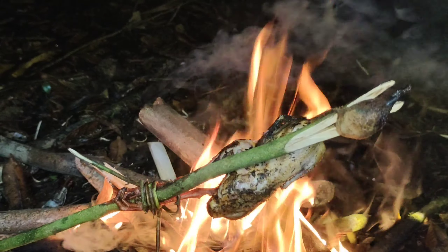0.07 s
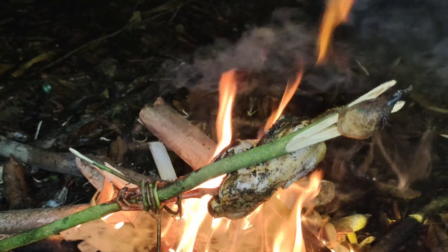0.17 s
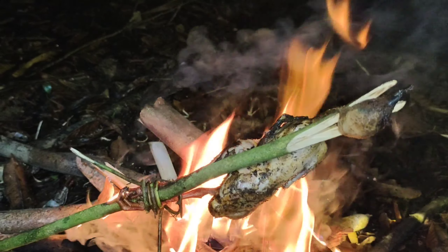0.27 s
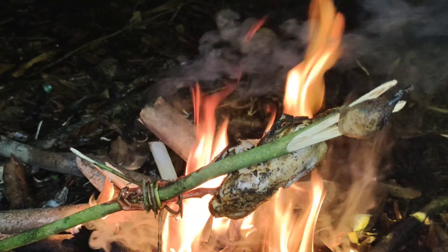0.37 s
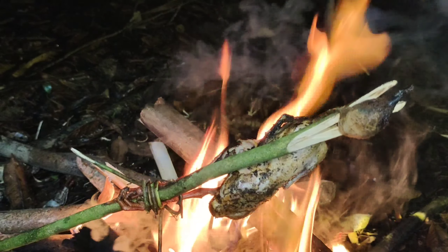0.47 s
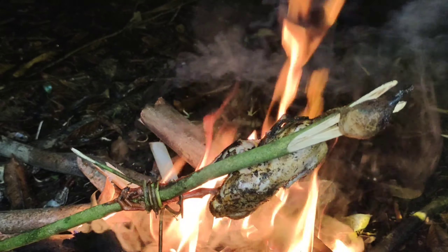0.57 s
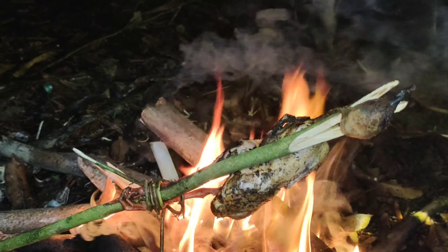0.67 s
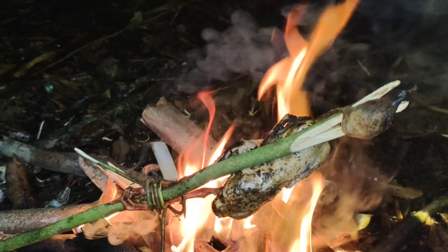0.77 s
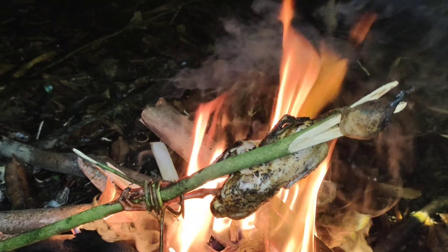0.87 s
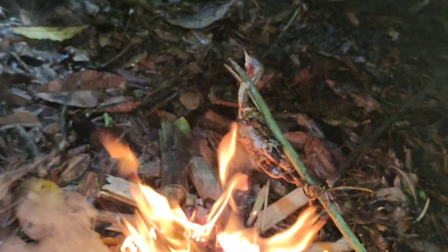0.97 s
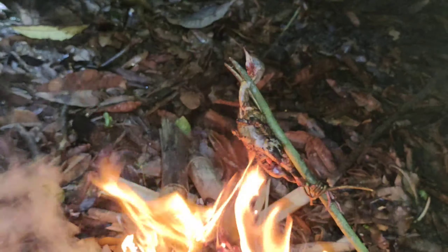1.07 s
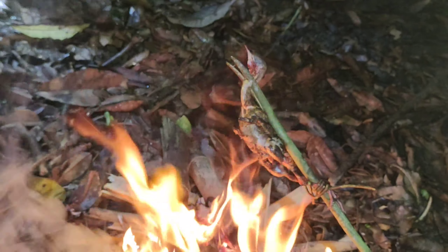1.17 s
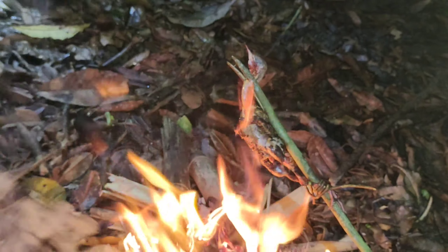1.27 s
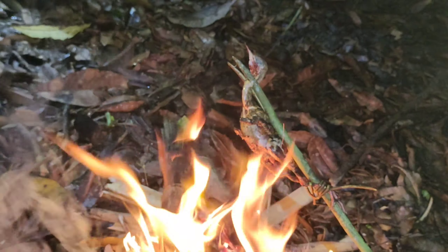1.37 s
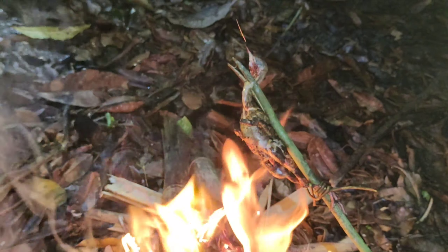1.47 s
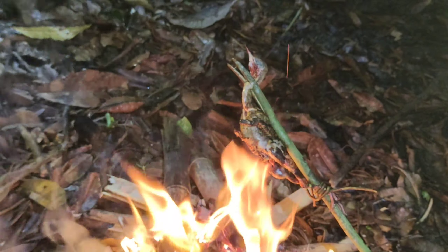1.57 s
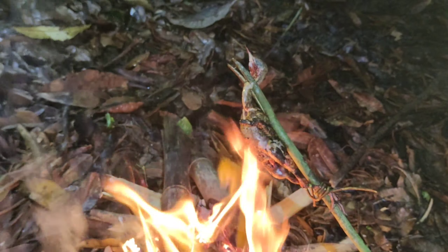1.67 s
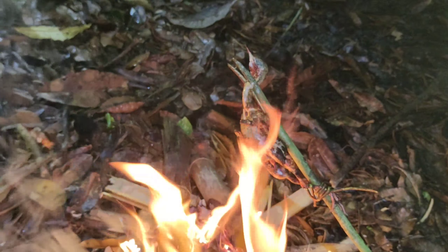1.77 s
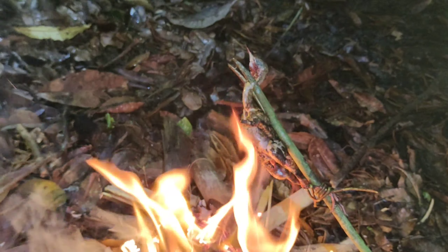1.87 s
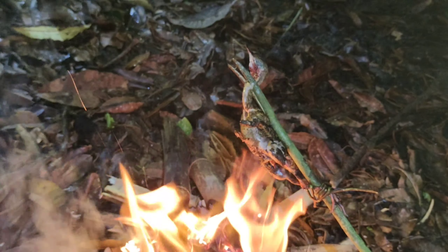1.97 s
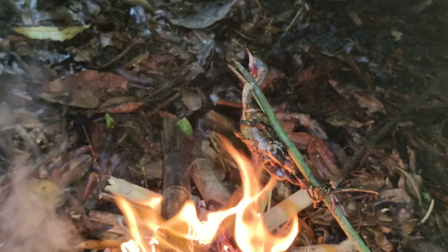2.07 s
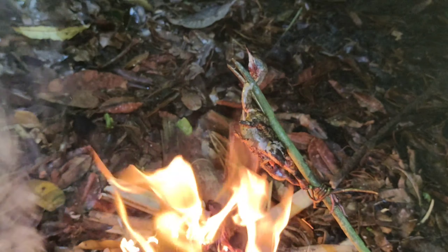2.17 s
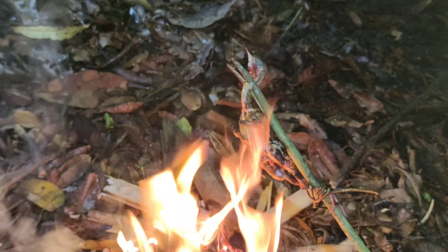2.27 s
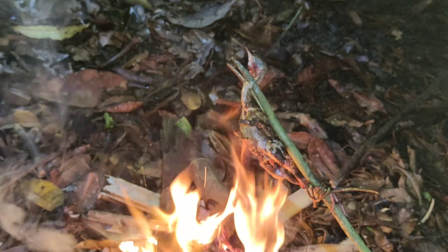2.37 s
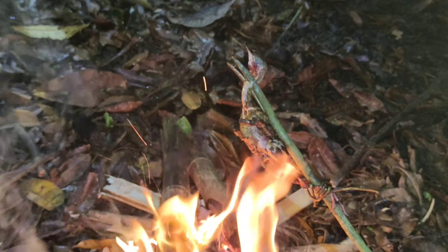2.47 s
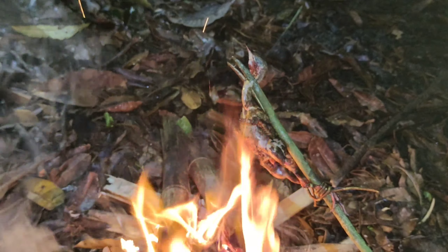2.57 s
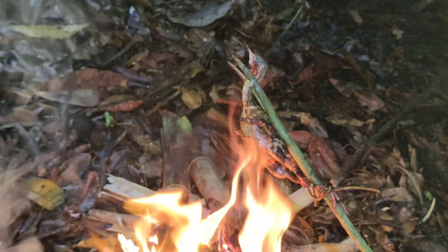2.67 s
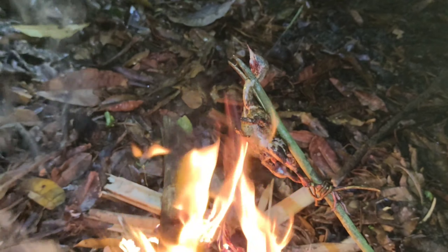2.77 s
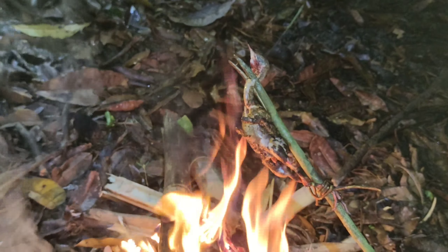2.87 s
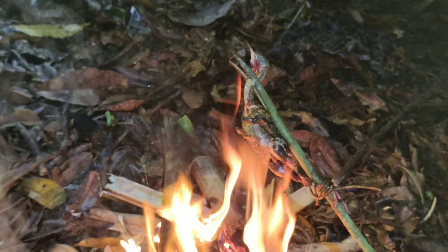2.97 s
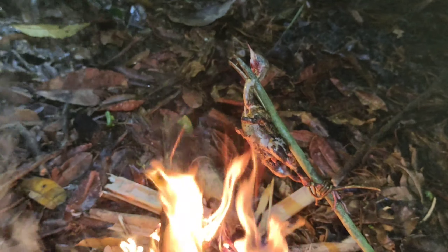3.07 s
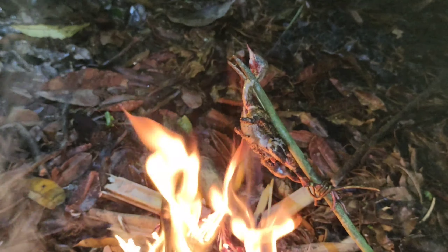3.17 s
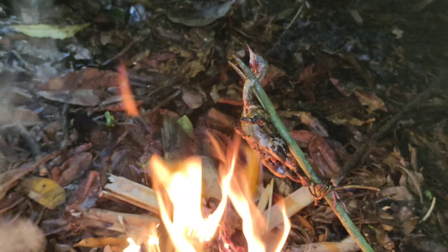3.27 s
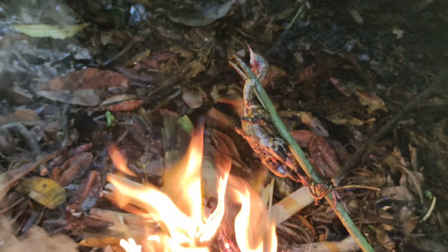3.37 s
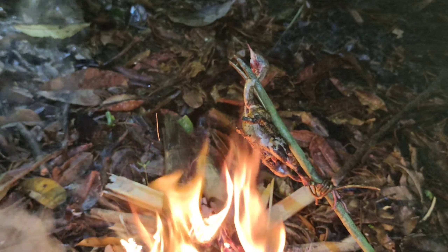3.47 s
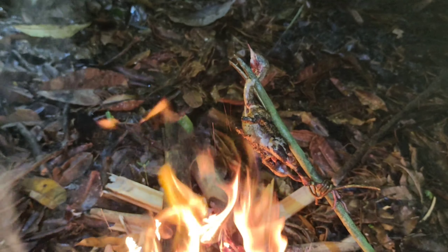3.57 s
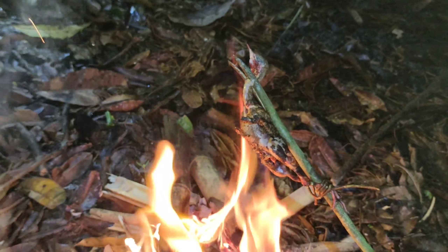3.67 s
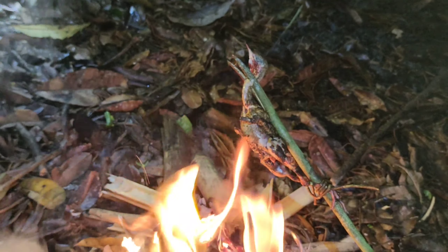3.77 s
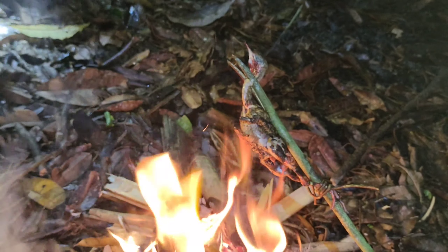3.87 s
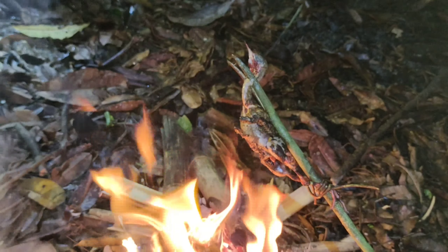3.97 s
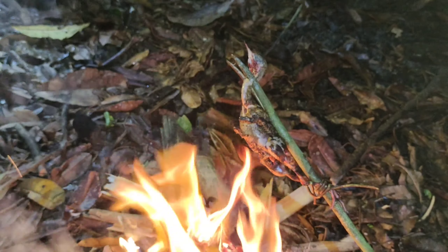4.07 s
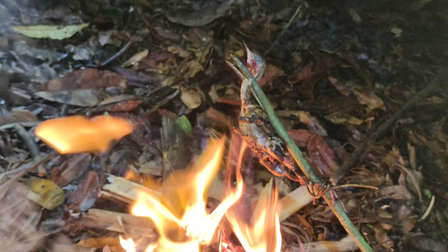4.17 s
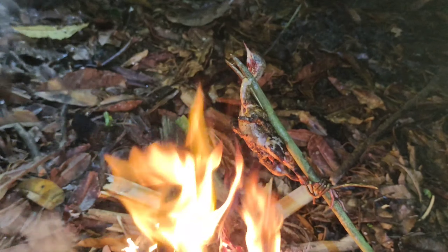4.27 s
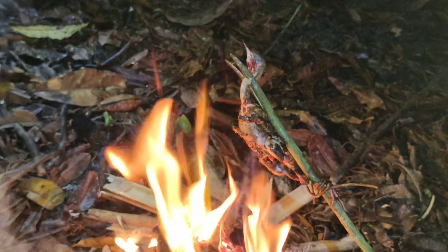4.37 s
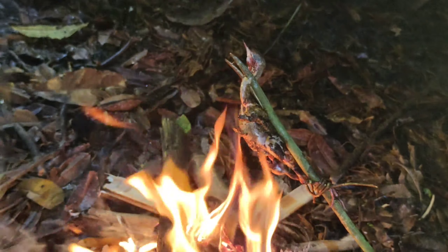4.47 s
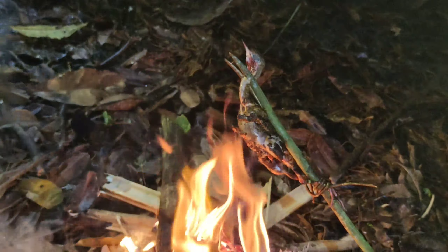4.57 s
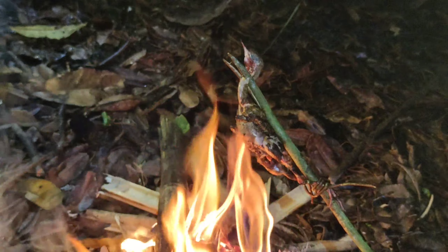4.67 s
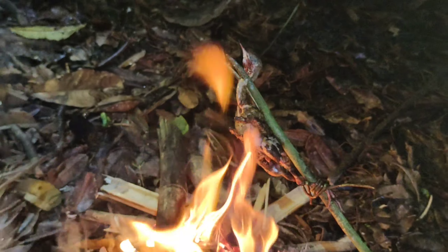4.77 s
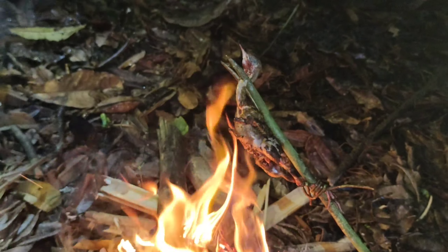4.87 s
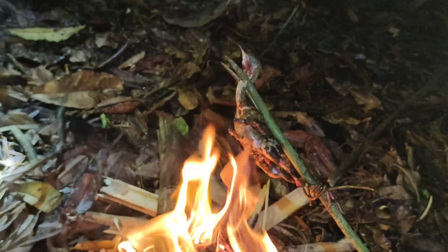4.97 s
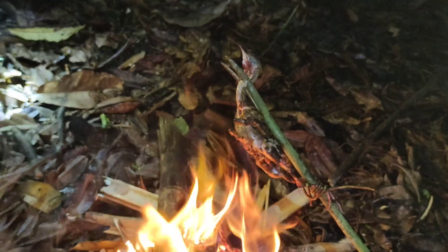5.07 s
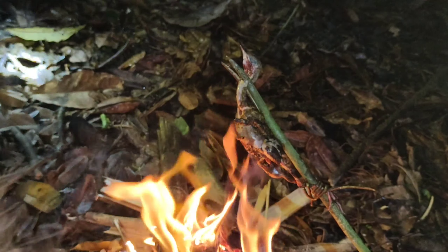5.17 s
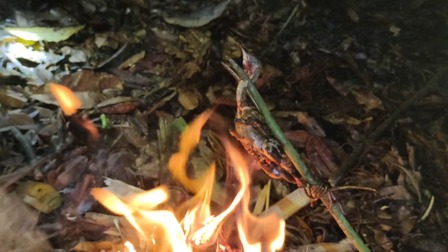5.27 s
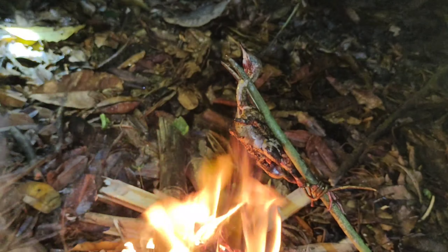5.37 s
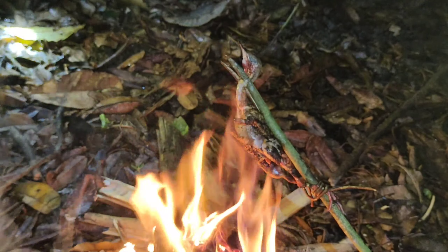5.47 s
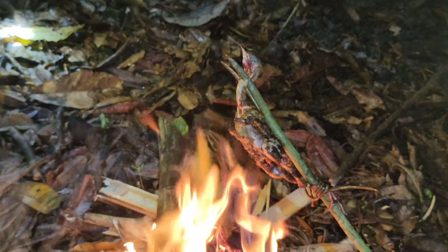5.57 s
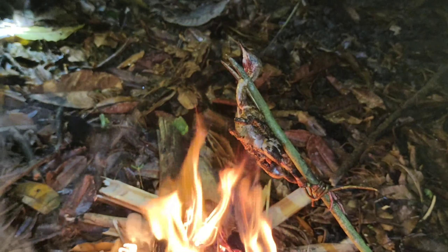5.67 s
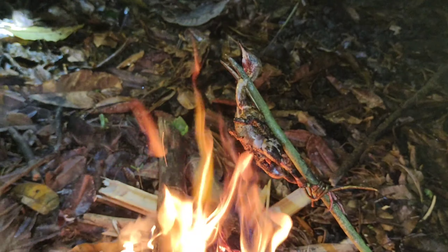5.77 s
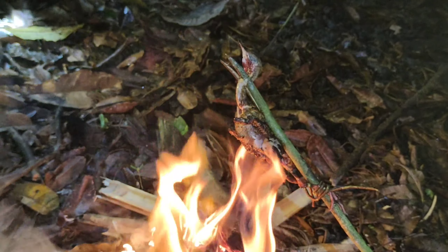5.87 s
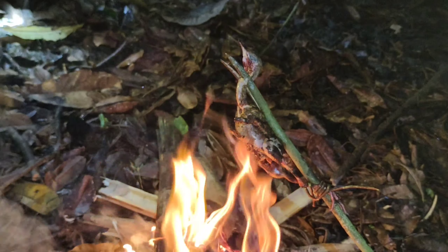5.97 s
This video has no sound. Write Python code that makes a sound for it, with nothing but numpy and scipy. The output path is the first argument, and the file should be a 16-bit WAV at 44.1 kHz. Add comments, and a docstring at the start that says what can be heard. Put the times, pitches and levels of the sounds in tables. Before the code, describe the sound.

Night insects buzz high in swelling waves around a small, close wood fire that softly flutters, sizzles and snaps.

```python
"""A high insect buzz, swelling in waves, around a small, close wood fire on a forest floor at night.
Crickets and katydids scrape their wings in pulses that the trees smear; far ones merge into steady bands.
Sticks snap and tick as fibres break. Burning gas puffs and flutters softly.
Sap sizzles and spits; its steam whistles faintly. A low hum rises briefly near the end."""
import sys
import numpy as np
from scipy import signal
from scipy.fft import rfft, irfft
from scipy.io import wavfile
from scipy.ndimage import uniform_filter1d

SR = 44100
rng = np.random.default_rng(int(sys.argv[2]) if len(sys.argv) > 2 else 0)


def persist_wave(psi):
    """Save psi, clipped to +-1, as 16-bit WAV."""
    counts = np.round(np.clip(psi, -1, 1) * 32767).astype(np.int16)
    wavfile.write(sys.argv[1], SR, np.atleast_2d(counts).T)


N = 265041
T = np.arange(N) / SR
HZ = np.maximum(np.fft.rfftfreq(N, 1 / SR), 1)

# raspy singers: name, f/Hz, stroke rate/Hz, lull level/dB
SINGERS = [("low", 6490, 34, -62.5), ("middle", 6640, 36, -64), ("high", 6870, 37, -62.5)]
# their overlapping phrases: singer, start/s, length/s, level/dB, L-R/dB
PHRASES = [("middle", 0.057, 0.34, -47.5, 3.8), ("high", 0.054, 0.25, -50, 2), ("low", 0.068, 0.17, -54, 2),
           ("high", 0.78, 0.24, -52, 7.7), ("middle", 0.844, 0.14, -49, 6.9), ("low", 0.88, 0.69, -56, 4.5),
           ("middle", 1.08, 0.51, -52, 6.9), ("high", 1.16, 0.4, -51, 5.9), ("high", 1.84, 0.28, -53, 7),
           ("middle", 1.896, 0.33, -47, 7.5), ("low", 1.95, 0.34, -53.5, 8.3),
           ("middle", 2.4, 0.42, -53, 6), ("high", 2.564, 0.27, -49, 7.6), ("middle", 2.93, 0.13, -49, 10),
           ("low", 3.11, 0.32, -53, 7.4), ("middle", 3.12, 0.34, -49.5, 4.7),
           ("high", 3.15, 0.36, -51.5, 6), ("low", 3.86, 0.42, -53.5, 8), ("middle", 4.02, 0.34, -49, 6.5),
           ("high", 4.09, 0.57, -50.5, 13.5), ("middle", 4.56, 0.37, -50.5, 6),
           ("low", 4.65, 0.38, -53, 7.1), ("middle", 5.3, 0.6, -49.5, 8), ("high", 5.5, 0.41, -50.5, 5),
           ("low", 5.56, 0.29, -53.5, 6)]
# cricket chirps: start/s, length/s, level/dB
CHIRPS = [(.45, .17, -56), (.98, .09, -50.5), (1.15, .19, -59), (1.51, .31, -52.2), (2.57, .34, -51),
          (3.26, .30, -51.5), (3.98, .28, -51.7), (4.48, .36, -59), (5.23, .36, -58.5), (5.92, .09, -54)]
# second cricket's pips: start/s, level/dB
PIPS = [(.3, -54), (.425, -59), (.545, -52.5), (.665, -56.5), (2.0, -62), (2.135, -63), (2.27, -62),
        (4.04, -61), (4.17, -58.5), (4.31, -61), (4.45, -62), (4.58, -61)]
# even cricket trills: start/s, length/s, f/Hz, stroke rate/Hz, level/dB, L-R/dB
TRILLS = [(0.992, 1.37, 7690, 76, -54.7, 15), (2.913, 2.23, 7690, 76, -54.4, 15),
          (5.55, 0.54, 7730, 87, -58.5, 7), (0, 0.43, 8370, 70, -61.5, -8), (.35, 0.76, 8020, 80, -65, 11),
          (0.56, 2.4, 6250, 60, -66.5, 12), (0.848, 0.48, 2960, 45, -73.5, 2),
          (2.05, .38, 4440, 68, -59, -2), (2.2, 0.2, 2980, 45, -72.5, 2), (2.587, 1.13, 3120, 44, -76, -3),
          (5.0, 0.24, 2980, 45, -72.5, 2)]
# katydid swells: centre/s, sigma/s, level/dB
LISPS = [(3.0, 0.058, -48), (3.203, 0.097, -52.5), (3.74, 0.074, -48), (4.12, 0.05, -51.5),
         (4.492, 0.061, -48), (4.68, 0.14, -52.5), (5.043, 0.054, -49), (5.45, 0.065, -46.5)]
# wood snaps; thin twigs ring high: t/s, body/dB, treble/dB, lowest ring/Hz, ring gain/dB
SNAPS = [(.0926, -63, -58, 800, -3), (.1255, -66, -58.5, 3200, 0), (.6296, -61, -66, 700, 2),
         (.885, -61, -67, 800, 0), (.9482, -62, -56, 3000, 0), (.962, -59, -64, 950, 0),
         (1.1456, -57.5, -58.5, 2700, 0), (1.262, -64, -53.5, 3000, 0), (1.2739, -55.5, -62, 2900, 5),
         (1.2987, -67, -55, 3000, 0), (1.8198, -56, -55.5, 1900, 2), (1.8483, -55.5, -55, 2600, 1),
         (2.2794, -62, -55.5, 1800, 0), (2.4692, -46.5, -43.7, 720, -3), (3.1355, -61, -66, 700, -3),
         (3.142, -55.5, -58, 600, -3), (3.1881, -52.5, -46, 760, 11), (3.2439, -60, -59, 900, 0),
         (3.4399, -56.5, -57, 1300, 0), (3.6, -57, -55.5, 1200, 2), (3.7869, -58, -56, 2200, 0),
         (3.8695, -64, -58, 2600, 0), (4.3518, -56, -51.5, 2700, 0), (4.6127, -57, -59, 2700, 4),
         (4.8398, -53, -50, 1400, 0), (5.1162, -69, -52.5, 3200, 0), (5.2958, -58, -65, 2600, 7),
         (5.3613, -56, -54, 2300, 4), (5.7192, -68, -53.5, 2400, 0)]
# stick resonances: multiple of lowest ring, Q, gain/dB
STICK_MODES = [(1, 9, -5), (1.54, 8, 0)]
# spectrum of a snap's bright crack: f/Hz, gain/dB
CRACK_EQ = [(1000, -18), (5000, -6), (8000, 0), (9500, 4), (11500, 2), (15000, 3)]
# spectrum of a snap's woody knock: f/Hz, gain/dB
KNOCK_EQ = [(200, -8), (650, 5), (1200, 4), (2500, 3), (4500, 1), (7000, -6), (15000, -22)]
# gas igniting: t/s, level/dB, final f/Hz
PUFFS = [(.317, -47, 140), (.353, -49, 185), (.38, -46.5, 145), (.461, -43, 170), (.497, -49.5, 115),
         (.53, -50, 125), (.582, -47.5, 210), (.632, -47, 150), (.655, -49, 120), (.724, -48.5, 125),
         (.866, -48, 170), (.878, -46.5, 235), (1.36, -46.5, 170), (2.817, -45, 200), (2.863, -46, 150),
         (3.14, -49.5, 210), (3.65, -45, 135), (3.903, -49, 160), (4.02, -50, 320), (4.056, -49, 210),
         (5.165, -47.5, 160), (5.637, -49, 160)]
# flame spectrum: f/Hz, gain/dB
FLAME_EQ = [(15, -60), (25, -42), (43, -34), (82, -1), (102, 1), (160, 0), (244, -9), (350, -11.5),
            (502, -19.5), (763, -24), (900, -40), (1170, -50), (1980, -120)]
# flame stereo width: f/Hz, side-mid/dB
FLAME_SIDE_EQ = [(30, -30), (80, -16), (160, -13.5), (350, -7), (700, -3.5)]
# flare-ups: centre/s, sigma/s, level/dB
FLARES = [(3.72, 0.11, -63.5)]
# sap boiling up: centre/s, sigma/s, level/dB
SURGES = [(3.17, 0.04, -55.5), (3.48, 0.047, -55.5), (3.78, 0.031, -54), (4.33, 0.1, -59.5),
          (4.6, 0.044, -59), (4.85, 0.034, -50.5), (4.935, 0.017, -55), (4.9, 0.11, -54.5)]
# sizzle spectrum: f/Hz, gain/dB
SIZZLE_EQ = [(400, -8), (720, 0), (1000, -0.5), (1450, -3), (1950, 1.5), (2600, 1.5), (3100, 0), (3700, -9),
             (5000, -19), (7000, -5), (15000, -5)]
# sap spurt spectrum: f/Hz, gain/dB
SPURT_EQ = [(400, -12), (900, -5), (3000, 1), (5000, 4), (9000, 5.5), (15000, 3)]
# steam whistles: start/s, length/s, first f/Hz, last f/Hz, level/dB, hoarseness as share of f
WHISTLES = [(1.92, .055, 1110, 1150, -71, .04), (2.025, .09, 1050, 1020, -67, .06),
            (4.94, .11, 2030, 1800, -71, .01), (5.15, .18, 1835, 1795, -72, .01),
            (5.46, .22, 1790, 1740, -75, .01)]
# far insect bands, and a broad high air hiss: f/Hz, width/Hz, level/dB, L-R/dB
FAR_BANDS = [(2920, 510, -68, -0.5), (3420, 187, -66.5, 2.5), (4005, 215, -63, -1), (4543, 257, -57.5, 2),
             (5636, 364, -58.5, 2.5), (6460, 890, -55.5, 2), (8420, 1570, -52, -7),
             (9100, 2360, -55.5, -2.5), (13400, 5700, -58.5, 0.5), (15000, 2000, -63, 19)]
# effort of far bands above 8 kHz, used relative to its mean: t/s, level/dB
FAR_EFFORT = [(0.0, -55), (0.85, -54.5), (2.16, -52), (4.17, -51.5), (4.89, -50.5), (5.6, -50.5),
              (6.01, -52.5)]


def wave_chorus(lull_side_db=8):
    """Three raspy singers overlap phrases; the buzz shifts pitch as they enter and drop out."""
    out = 0
    for name, hz, stroke_hz, lull_db in SINGERS:
        drifting_hz = hz * (1 + .004 * walk(7))
        song = wings(drifting_hz, stroke_hz, duty=.5, droop=.014, unsteady=.12, waver=.006)
        power = (undb(lull_db) * pan(lull_side_db)) ** 2
        for singer, start, length, db, side_db in PHRASES:
            if singer == name:
                power = power + phrase_power(start, length) * (undb(db) * pan(side_db)) ** 2
        out = out + unit(forest(song, wet_db=5, t60_s=.17)) * np.sqrt(power)
    return out


def chirping_cricket(hz=4531, stroke_hz=68):
    """Uneven wing strokes purr in chirps, on the right."""
    chirps = sum(gate(start, length, edge_s=.04) * undb(db)
                 * wings(hz, stroke_hz, duty=1, droop=.0037, unsteady=.0706, waver=.002)
                 for start, length, db in CHIRPS)
    flicker = undb(1.2 * walk(40))
    return forest(chirps * flicker, wet_db=-7, t60_s=.35) * pan(-15.5)


def pipping_cricket(hz=4715, stroke_hz=85):
    """Short runs of pips, a few wing strokes each."""
    runs = sum(undb(db) * gate(start, length_s=.05, edge_s=.0088) for start, db in PIPS)
    song = wings(hz, stroke_hz, duty=.9, droop=.008, unsteady=.1, waver=.004)
    return forest(runs * song, wet_db=0, t60_s=.1)


def trilling_crickets():
    """Small crickets trill, each at its own even stroke rate."""
    songs = sum(undb(db) * gate(start, length, edge_s=.02) * pan(side_db)
                * wings(hz, stroke_hz, duty=1, droop=.0025, unsteady=.01, waver=.00354)
                for start, length, hz, stroke_hz, db, side_db in TRILLS)
    return forest(songs, wet_db=-6, t60_s=.3)


def katydid():
    """Very high, toneless rasps swell and fade on the left."""
    rasp = unit(band(14800, width_hz=1700) + band(12500, width_hz=4700))
    flutter = undb(walk(190))
    return swells(LISPS) * rasp * flutter * pan(6.5)


def ticks(latest_s, per_s=2, body_db=-66.5, treble_db=-64, spread_db=2.5, ring_hz=900):
    """Faint snaps at random times, as rows like SNAPS."""
    return [(when * latest_s, body_db + spread_db * (2 * body - 1),
             treble_db + spread_db * (2 * treble - 1), ring_hz * 2 ** octaves, 0)
            for when, body, treble, octaves in rng.random((round(per_s * T[-1]), 4))]


def snaps(fastest_tear_s=.00014, rattle_s=.0022, rattle_gain=.11):
    """A fibre breaks: a crack, and a push that knocks and rings its stick. Litter scatters both."""
    crack, knock = np.zeros((2, 2, N))
    stick = np.zeros(N)
    t = T[:1024]
    hardest_db = max(row[2] for row in SNAPS)
    for at_s, body_db, treble_db, ring_hz, ring_db in SNAPS + ticks(latest_s=T[-2 * len(t)]):
        i = int((at_s + .0014) * SR)
        span = slice(i, i + len(t))
        noise = rng.standard_normal((3, len(t)))  # left, right, common
        tear_s = fastest_tear_s / undb(treble_db - hardest_db)  # weak breaks tear slowly
        tear = (noise[:2] + noise[2]) * np.exp(-t / tear_s)
        crack[:, span] += unit(tear) * undb(treble_db) * pan(4)
        rattle = rattle_gain * noise[2] * np.exp(-t / rattle_s)
        push = unit((t == 0) + rattle) * undb(body_db)
        highpass = signal.butter(2, ring_hz / 2 ** .5, "high", fs=SR)
        knock[:, span] += signal.lfilter(*highpass, push)
        for multiple, q, db in STICK_MODES:
            mode = signal.iirpeak(multiple * ring_hz, q, fs=SR)
            stick[span] += undb(ring_db + db) * signal.lfilter(*mode, push)
    return forest(colour(crack, CRACK_EQ) + colour(knock, KNOCK_EQ) + stick, wet_db=-5, t60_s=.05)


def puffs(swell_s=.0045, sag=.15, thump_db=-3.3, rush_db=-14):
    """A gas pocket ignites: a thump that sinks in pitch as it expands, plus a ragged rush."""
    out = np.zeros(N)
    rush = undb(rush_db) * band(310, width_hz=320)[0]
    t = T[:SR // 20]
    swell = t / swell_s * np.exp(1 - t / swell_s)
    for at_s, db, hz in PUFFS:
        i = int(at_s * SR)
        span = slice(i, i + len(t))
        cycles = hz * (t + sag * swell_s * (1 - np.exp(-t / swell_s)))
        thump = undb(thump_db) * np.sin(2 * np.pi * cycles)
        out[span] += undb(db) * swell * (thump + rush[span])
    return out


def flames(steady_db=-60):
    """Burning gas: a low, uneven flutter, near mono, with one flare-up."""
    mid, side = colour(rng.standard_normal((2, N)), FLAME_EQ)
    stereo = mid + colour(side, FLAME_SIDE_EQ) * np.array([[1], [-1]])
    flutter = undb(1.7 * walk(45))
    burn = np.hypot(undb(steady_db), swells(FLARES))
    return unit(flutter * stereo) * burn


def sap_sizzle(simmer_db=-61, bursts_per_s=900):
    """Sap simmers as a smooth hiss; in surges, tiny cells burst through it."""
    bursts = (rng.random(N) < bursts_per_s / SR) * rng.standard_normal(N)
    bursts *= undb(2.4 * np.minimum(rng.exponential(size=N), 4))
    grains = unit(forest(bursts, wet_db=-3, t60_s=.04))
    hiss = unit(rng.standard_normal(N) + undb(2) * rng.standard_normal((2, N)))
    simmer = unit(colour(hiss, SIZZLE_EQ))
    boil = unit(colour(grains + hiss[::-1, ::-1], SIZZLE_EQ))  # reversed to decorrelate
    return simmer * undb(simmer_db) + boil * swells(SURGES)


def sap_spurt(centre_s=4.845, sigma_s=.019, db=-44, drops_per_s=1700):
    """A sap pocket bursts in a brief, bright sputter of droplets."""
    onsets = rng.random(N) < drops_per_s / SR
    drops = onsets * (rng.standard_normal(N) + rng.standard_normal((2, N)))
    spray = colour(unit(drops) + rng.standard_normal((2, N)), SPURT_EQ)
    return unit(spray) * swells([(centre_s, sigma_s, db)])


def steam_whistles():
    """Thin steam jets whistle, gliding as their pressure changes."""
    out = 0
    quiver, flicker = walk(300), undb(2.5 * walk(40))
    for start, length, first_hz, last_hz, db, hoarse in WHISTLES:
        glide_hz = np.interp(T, [start, start + length], [first_hz, last_hz])
        out = out + gate(start, length, edge_s=.019) * undb(db) * tone(glide_hz * (1 + hoarse * quiver))
    return out * flicker


def far_chorus(flicker_db=1.48):
    """Each far species holds its own band and flickers a little; a broad, soft air hiss fills the top."""
    effort_db = np.interp(T, *np.transpose(FAR_EFFORT))
    effort = undb(effort_db - effort_db.mean())
    return sum(band(hz, width_hz) * undb(db + flicker_db * walk(14)) * pan(side_db)
               * (effort if hz > 8000 else 1) for hz, width_hz, db, side_db in FAR_BANDS)


def low_hum(hz=96, db=-59):
    """A faint, wavering hum rises briefly under the fire."""
    hum = tone(hz * (1 + .0201 * walk(17)))
    return gate(start_s=4.46, length_s=.6, edge_s=.08) * undb(db + 1.6 * walk(6.5)) * hum


def wings(hz, stroke_hz, duty, droop, unsteady, waver):
    """Each stroke rings the wing for `duty` of a cycle; pitch droops as the stroke slows."""
    cycle = np.cumsum(stroke_hz * (1 + unsteady * walk(25)) / SR) % 1
    stroke = np.minimum(cycle / duty, 1)
    ring_hz = hz * (1 + droop * (.5 - stroke) * (stroke < 1) + waver * walk(150))
    return unit(np.sin(np.pi * stroke) * tone(ring_hz))


def forest(x, wet_db, t60_s):
    """Direct sound plus scatter from trunks and leaves, different at each ear."""
    t = T[:SR // 2]
    scatter = rng.standard_normal((2, len(t))) * np.exp(-np.log(1000) * t / t60_s)
    scatter /= np.sqrt(np.sum(scatter ** 2, axis=1, keepdims=True))
    wet = signal.fftconvolve(np.atleast_2d(x), scatter, axes=1)[:, :N]
    return (x + undb(wet_db) * wet) / np.sqrt(1 + undb(2 * wet_db))


def phrase_power(start_s, length_s, rise_s=.024, fall_s=.033):
    """Power envelope: swell, hold, fade."""
    rise = 1 + np.tanh((T - start_s) / (2 * rise_s))
    fall = 1 + np.tanh((start_s + length_s - T) / (2 * fall_s))
    return rise * fall / 4


def swells(rows):
    """Gaussian gain swells, added in power."""
    return np.sqrt(sum(undb(2 * db) * np.exp(-((T - at_s) / sigma_s) ** 2) for at_s, sigma_s, db in rows))


def gate(start_s, length_s, edge_s):
    """Window with linear edges."""
    return np.clip(np.minimum(T - start_s, start_s + length_s - T) / edge_s + .5, 0, 1)


def tone(hz):
    """Sine following a per-sample frequency."""
    return np.sin(2 * np.pi * np.cumsum(hz) / SR)


def band(hz, width_hz):
    """Two independent noises in a bell-shaped band."""
    bell = .5 ** (2 * ((HZ - hz) / width_hz) ** 2)
    return unit(irfft(rfft(rng.standard_normal((2, N))) * bell, N))


def colour(x, points):
    """Filter by points of f/Hz, gain/dB."""
    hz, db = np.transpose(points)
    return irfft(rfft(x) * undb(np.interp(np.log(HZ), np.log(hz), db)), N)


def walk(rate_hz):
    """Smooth random drift, rms 1."""
    hold = max(int(SR / rate_hz), 2)
    steps = np.repeat(rng.standard_normal(N // hold + 1), hold)
    return unit(uniform_filter1d(steps, hold)[:N])


def pan(side_db):
    """Constant-power gains for an L-R level difference."""
    gains = undb(np.array([side_db, -side_db]) / 2).reshape(2, -1)
    return gains / np.sqrt(np.mean(gains ** 2, axis=0))


def undb(db):
    """Decibels to gain."""
    return 10 ** (np.asarray(db) / 20)


def unit(x):
    """Scale to rms 1."""
    return x / np.sqrt(np.mean(x ** 2) + 1e-18)


def scene():
    """Insects all around, fire in front."""
    insects = far_chorus() + wave_chorus()
    insects += chirping_cricket() + pipping_cricket() + trilling_crickets() + katydid()
    fire = flames() + puffs() + sap_sizzle() + sap_spurt() + steam_whistles() + snaps()
    return insects + fire + low_hum()


def record(dry):
    """Steep low-pass on the top treble."""
    top_hz = 15680
    return signal.sosfilt(signal.ellip(10, .2, 70, top_hz, fs=SR, output="sos"), dry)


dry = scene()
out = record(dry)
persist_wave(out)
```